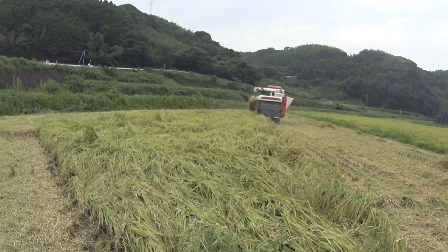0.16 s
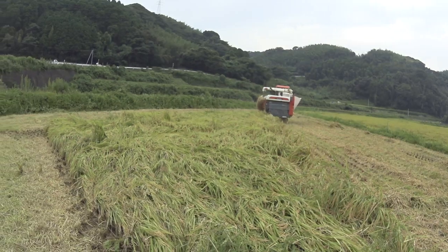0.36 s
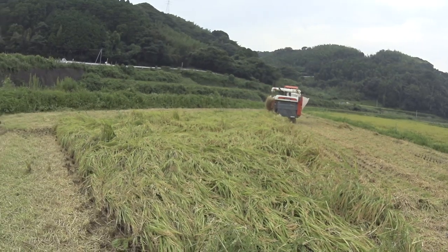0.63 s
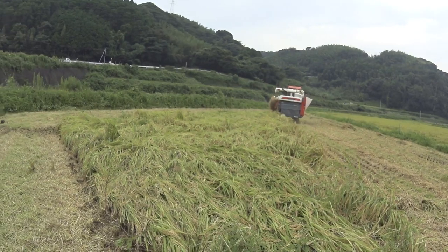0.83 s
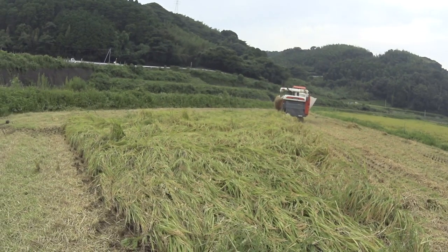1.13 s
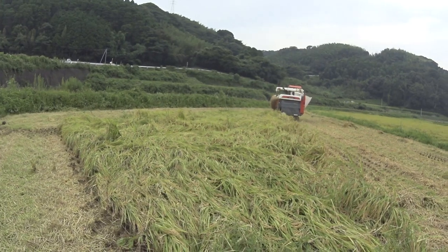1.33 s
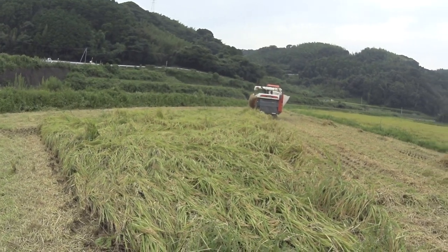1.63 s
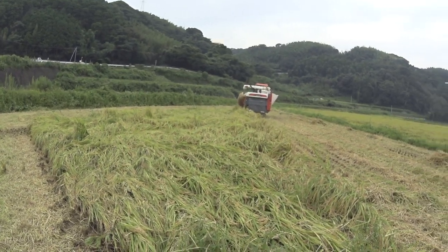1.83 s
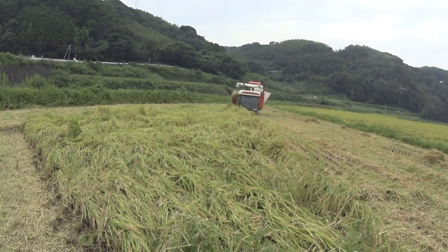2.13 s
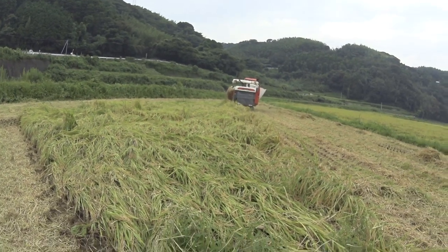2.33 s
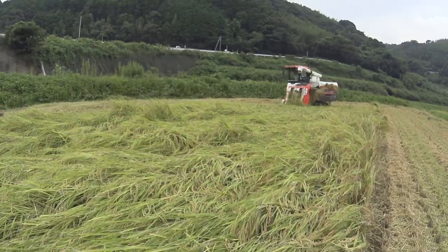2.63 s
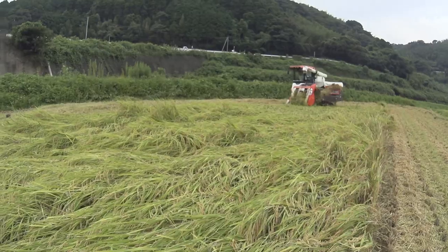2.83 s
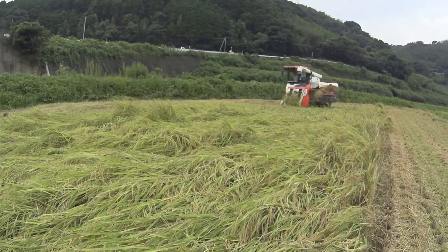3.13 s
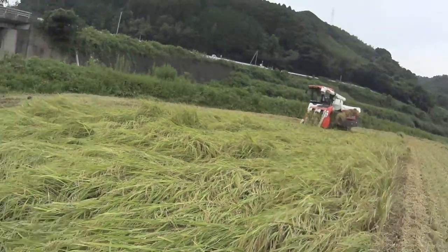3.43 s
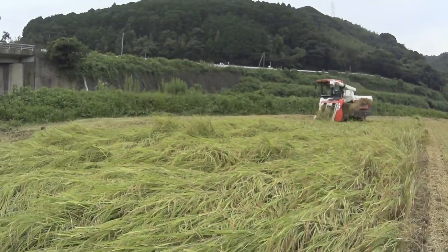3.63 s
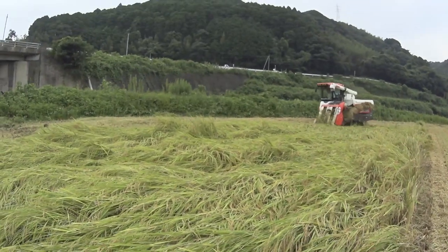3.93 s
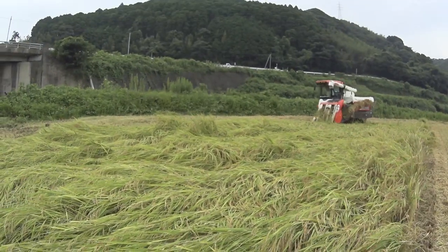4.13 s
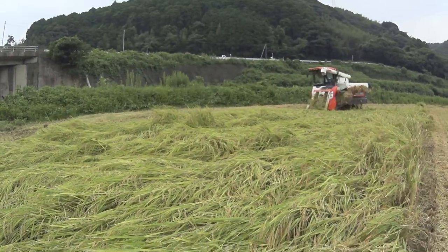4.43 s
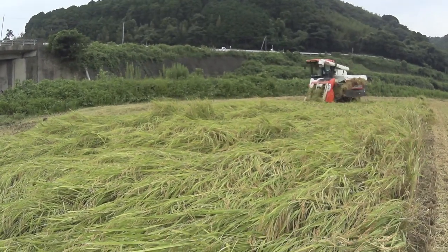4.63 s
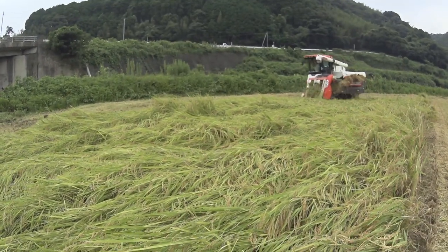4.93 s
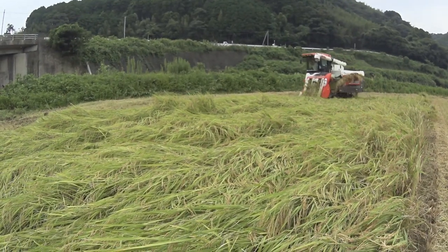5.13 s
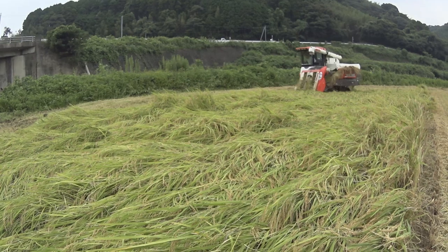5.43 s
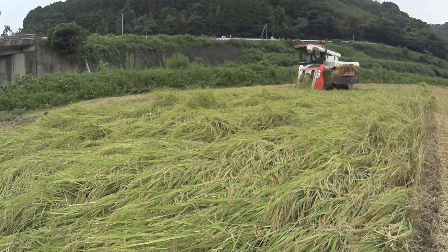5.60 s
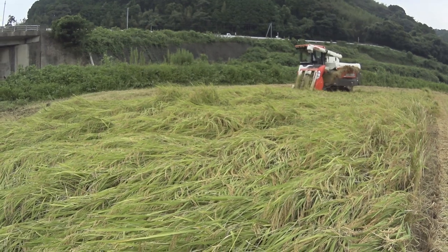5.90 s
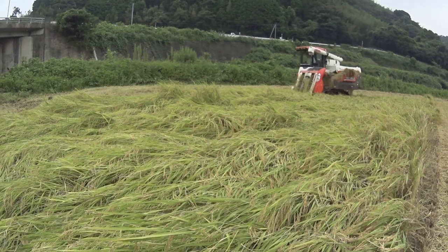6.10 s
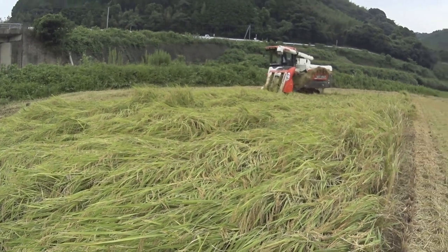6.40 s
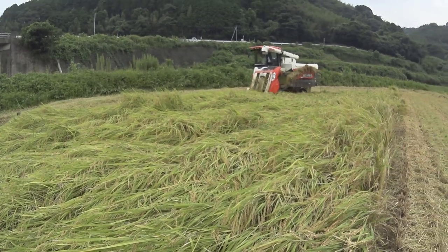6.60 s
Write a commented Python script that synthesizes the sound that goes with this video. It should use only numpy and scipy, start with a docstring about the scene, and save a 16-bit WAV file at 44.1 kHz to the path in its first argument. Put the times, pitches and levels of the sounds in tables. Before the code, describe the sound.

A hand-held stereo camera hears a combine across a field: distant broadband roar over a faint engine drone. After about two and a half seconds it drops silent for an instant, then the closer machine bursts in with knocks, scrapes and bumps from the hand. Once these settle, the roar grows louder, throbbing and rattling, with a quick regular knife clack and occasional high dry squeaks.

```python
"""Rice harvester across a field

A small harvester works far off, then, after a short silent cut, nearer; a hand-held camera hears it in stereo.
Steady tones make the engine and shafts, coloured noise the roar of fan, drum and straw over soft ground.
Dying rings make the knife's clacks and the jingle of chain and grain; short tone blips make the squeaks.
At the microphones the hand shifts on the camera case around the cut: rings tick, low pushes thump and
resonant noise rubs. These peaks make the limiter duck the machine.
"""
import sys
import numpy as np
from scipy import signal
from scipy.io import wavfile
from scipy.ndimage import uniform_filter1d

SR = 44100
rng = np.random.default_rng(int(sys.argv[2]) if len(sys.argv) > 2 else 0)


def amplitude_ratio(level_db):
    """Convert a level in decibels to the matching linear amplitude (field) ratio."""
    exponent = np.asarray(level_db, float) / 20
    return 10 ** exponent


def store_pcm(level_fs):
    """Save levels as 16-bit WAV."""
    pcm = np.round(np.clip(level_fs, -1, 1) * 32767).astype(np.int16)
    wavfile.write(sys.argv[1], SR, np.atleast_2d(pcm).T)


N = 298099
T = np.arange(N) / SR
CUT_S, RESTART_S = 2.549, 2.632  # the far take ends, the near one begins


def evened(x):
    """Scales to rms 1."""
    return x / np.sqrt(np.mean(x ** 2) + 1e-20)


def read(points, hz):
    """Reads a spectrum table on a log-frequency axis."""
    f, value = np.transpose(points)
    return np.interp(np.log(hz + 1), np.log(f + 1), value)


def add(mix, s, sound):
    """Mixes a sound in at s seconds."""
    part = mix[round(s * SR):][:len(sound)]
    part += sound[:len(part)]


def drift(t, top_hz, low_hz=0.3035):
    """Slow random wander of rms 1: sines of random phase, the slower the stronger."""
    rates = np.geomspace(low_hz, top_hz, num=24)
    return evened(sum(np.sin(2 * np.pi * (f * t + rng.random())) / np.sqrt(f) for f in rates))


def resonate(x, hz, width):
    """One resonance, hz at its centre, with a gain of about 1 there."""
    r = np.exp(-np.pi * width / SR)
    return 2 * signal.lfilter([1 - r], [1, -r * np.exp(2j * np.pi * hz / SR)], x).real


def ring(hz, t60, length=.08, rise=0.0018):
    """One dying mode with a soft start; times in s."""
    t = T[:round(length * SR)]
    return amplitude_ratio(-60 * t / t60) * np.sin(2 * np.pi * hz * t) * np.minimum(t / rise, 1)


# how loud the machine arrives; it swells as it turns this way after the cut: t/s, level/dB
ARRIVING_LEVEL = [(0, -17.5), (1.9, -18.5), (2.55, -20.5), (2.63, -16), (3.1, -14), (3.95, -13.5),
                  (4.42, -8), (4.7, -11.5), (5, -9), (5.5, -10), (6.3, -9.5), (6.76, -7.5)]


def loudness(t):
    """The machine's level in dB at times t."""
    return np.interp(t, *np.transpose(ARRIVING_LEVEL))


# engine and shaft tones, the upper five multiples of a gear mesh near 109 Hz:
# f/Hz, far rms level/dB, near rms level/dB, waver/dB
ENGINE_TONES = [(72.7, -55, -47, 1), (93.8, -38, -38.5, 0.9), (187.5, -44.5, -38, 3.2),
                (210, -52, -55, 5.5), (280.5, -54, -55, 1), (376, -56, -53, 1), (436, -57, -52, 4),
                (545, -60, -55, 4), (653, -60, -52, 4), (764, -62, -51, 4), (868, -60, -51, 4)]


def hum():
    """Firing tone, its overtones and shaft tones, each wavering a little in pitch and strength."""
    slow, out = T[::256], 0
    for hz, far_db, near_db, waver_db in ENGINE_TONES:
        bend, waver = (np.interp(T, slow, drift(slow, 8.1)) for _ in "ab")
        turns = np.cumsum(hz * (1 + 0.00415 * bend)) / SR + rng.random()
        distance_db = np.where(T < RESTART_S, far_db, near_db)
        level_db = distance_db + np.clip(waver_db * waver, -9, 3)
        out = out + np.sqrt(2) * amplitude_ratio(level_db) * np.sin(2 * np.pi * turns)
    return out * amplitude_ratio(np.array([[.8], [-.8]]))  # dB, leaning left


# the knife crank turns almost steadily; play in the joints makes each clack early or late, hard or soft
FIRST_CLACK_S, CRANK_TURNS_PER_S = 3.853, 8.22
PLAY_S, CLACK_SPREAD_DB, CLACK_OVER_ROAR_DB = .005, 1.5, 5
BAR_HZ, BAR_SPREAD_HZ = 1683, 29
# the load swings, so the crank falls behind and catches up
LAG_S, LAG_CYCLE_S, LAG_START_S = .014, 1.32, 4.35
# squeaks of dry joints in the near machine: t/s, peak level/dB, f/Hz
JOINT_SQUEAKS = [(3.66, -12, 4000), (3.685, -9, 4300), (3.695, -10, 4050), (4.245, -10, 3990),
                 (4.513, -8, 4030), (4.528, -11, 4050), (5.0, -11, 3980), (5.06, -8, 4000),
                 (5.925, -9, 3700), (6.165, -7, 4360), (6.47, -8, 4100)]


def knife():
    """Each turn of the knife crank clacks on the cutter bar; dry joints squeak now and then."""
    out = np.zeros(N)
    turns = np.arange(FIRST_CLACK_S, N / SR, 1 / CRANK_TURNS_PER_S)
    for s, (late, hard, high) in zip(turns, rng.standard_normal((len(turns), 3))):
        db = loudness(s) + CLACK_OVER_ROAR_DB + CLACK_SPREAD_DB * hard
        lag = LAG_S * np.sin(2 * np.pi * (s - LAG_START_S) / LAG_CYCLE_S)
        clack = ring(BAR_HZ + BAR_SPREAD_HZ * high, 0.029, rise=0.0025)
        add(out, s + PLAY_S * late + lag, amplitude_ratio(db) * clack)
    blip = np.hanning(round(.015 * SR))
    for s, db, hz in JOINT_SQUEAKS:
        add(out, s, amplitude_ratio(db) * np.sin(2 * np.pi * hz * T[:len(blip)]) * blip)
    return out


TICK_LEAN_DB, THUMP_LEAN_DB = 4, 4.1  # the hand sits nearer the left port
DULL_DB = -6  # dull part of a rub, before the lean between ports
# skin that catches on the case locks onto its main ring
SQUEAL_HZ, SQUEAL_WANDER_HZ, SQUEAL_SHARE = 1245, 60, .65
# fingers on the camera case: t/s, level of the lower rings/dB, upper rings above that/dB
FINGER_TICKS = [(2.187, -2, -19), (2.478, 3.5, -11), (2.505, -4, -9), (2.696, -6, -15), (2.729, 0.5, 11),
                (2.831, -5, 2), (2.859, -2, 10.5), (2.878, -8, 5), (2.882, -10, -2), (2.885, -19, 31.5),
                (2.95, -12, 18), (2.956, 3, 3), (3.011, 1, -9), (3.167, -3.5, -14), (3.196, -5, -4),
                (3.263, -3, -2), (3.362, 8, -9), (3.475, 4, -10), (3.492, 1, -15)]
# rings of the camera case, before each port shifts them: f/Hz, level/dB, t60/s
CASE_RINGS = [(1213, 4, 0.0085), (900, 4, 0.0053), (540, -2, 0.0047), (2194, -7, 0.03),
              (1840, -12.5, 0.027)]
# the grip shoves the microphones: t/s, level/dB, f/Hz, way (in 1, out -1)
GRIP_THUMPS = [(2.188, -5, 144, 1), (2.506, -7, 210, 1), (2.692, -8.5, 168, -1), (2.728, -3, 230, -1),
               (2.83, -2, 135, 1), (2.875, -2.5, 220, 1), (2.903, -12, 90, 1), (2.955, -6.5, 90, 1),
               (3.007, -3, 136, 1), (3.206, -4.5, 85, -1), (3.249, -11, 70, -1), (3.262, -3.5, 76.5, -1),
               (3.365, -3, 90, -1), (3.382, 0, 155, 1), (3.415, -10, 110, -1), (3.433, -6, 42, -1),
               (3.475, 4, 175, 1), (3.487, -6, 140, 1), (3.505, -12, 70, -1), (3.608, 0, 126, 1),
               (4.22, -4.5, 259, 1), (4.283, -7.5, 179, 1), (4.499, -20, 78, 1)]
# skin slides over the case: start t/s, length/s, level/dB, upper part above that/dB
SKIN_RUBS = [(2.702, 0.027, -22.5, -18), (2.863, 0.052, -14, -6), (2.934, 0.043, -17, -1.5),
             (3.008, 0.073, -9, -9), (3.066, 0.075, -20, 2), (3.204, 0.054, -17, -6),
             (3.361, 0.073, -6.5, -9.5), (3.47, 0.064, -21.5, -11)]


def hand():
    """Ticks ring the case, thumps push the diaphragms, rubs scrape; the two ports hear them unalike."""
    out = np.zeros((2, N))
    for s, db, upper_db in FINGER_TICKS:
        for ear, side in enumerate((1, -1)):
            tick = 0
            for hz, mode_db, t60 in CASE_RINGS:
                level = amplitude_ratio(mode_db + (upper_db if hz > 1500 else 0))
                tick = tick + level * ring(hz * (1 + 0.024 * side), t60, rise=0.00086)
            add(out[ear], s, amplitude_ratio(db + side * TICK_LEAN_DB / 2) * tick)
    for s, db, hz, way in GRIP_THUMPS:
        push = np.sign(way) * amplitude_ratio(db) * ring(hz, 4.2 / hz, length=.2)
        add(out[0], s, amplitude_ratio(THUMP_LEAN_DB / 2) * push)
        add(out[1], s + .07 / hz, amplitude_ratio(-THUMP_LEAN_DB / 2) * push)  # the far port lags a little
    for s, length, db, upper_db in SKIN_RUBS:
        scrape, other, slips = rng.standard_normal((SR // 5, 3))[:round(length * SR)].T
        stick_slip = amplitude_ratio(1.2 * evened(uniform_filter1d(slips, size=130)))  # skin sticks and slips
        stroke = signal.windows.tukey(len(scrape), .5) * stick_slip
        wander = evened(uniform_filter1d(other, size=200))
        squeal_turns = np.cumsum(SQUEAL_HZ + SQUEAL_WANDER_HZ * wander) / SR
        squeal = np.sqrt(2) * np.sin(2 * np.pi * squeal_turns)
        for ear, share, lean_db in zip(range(2), (0, 1.3), (2, -2)):
            grit = scrape + share * other
            lower = resonate(resonate(scrape + 0.29 * share * other, 1500, 260), 810, 220)
            lower = lower + 0.88 * resonate(grit, 720, 560)
            upper = resonate(resonate(grit, 1640, 900), 1650, 900)
            body = resonate(resonate(grit, 270, 520), 270, 520)
            lower = SQUEAL_SHARE * squeal + (1 - SQUEAL_SHARE) * evened(lower)
            rub = evened(lower) + amplitude_ratio(upper_db - lean_db) * evened(upper)
            rub = rub + amplitude_ratio(DULL_DB + lean_db) * evened(body)
            add(out[ear], s, amplitude_ratio(db) * stroke * rub)
    # one bright snap of a fingernail
    snap = resonate(rng.standard_normal(300), 5200, 4000) * np.hanning(300)
    for ear in out:
        add(ear, 2.848, amplitude_ratio(-12.0) * evened(snap))
    return out


# ringing panels of machine and camera, which also colour the roar:
# f/Hz, width/Hz, lift when far/dB, lift when near/dB
RINGING_PANELS = [(1270, 140, 7, 9.5), (1700, 340, 0, 5), (1850, 70, 5, 1), (1975, 110, -4, -2.5),
                  (2610, 55, 4, 4.5), (3120, 90, 5, 2), (3480, 100, 3.5, 0), (4720, 900, 8, 8.5),
                  (4872, 40, 0, 3.5), (6170, 130, 6, 5), (6460, 110, 3.5, 0), (6690, 190, 1, 7.5),
                  (7770, 40, 0, 8), (8647, 40, 0, 8)]


def jingle():
    """Chain links and grain strike the panels: tiny rings at random, following the machine's level."""
    out = np.zeros(N)
    for hz, width, *_ in RINGING_PANELS[4:-2]:  # the bright panels
        chance, size = rng.random((N, 2)).T
        for shift in (-.3, .3):  # two pitches a panel, each struck about 4.5 times a second
            struck = (chance % .5 < 4.5 / SR) * ((chance > .5) == (shift > 0))
            strikes = struck * amplitude_ratio(-7 * size)
            mode = ring(hz + shift * width, 0.028, length=.04, rise=0.0028)
            out += signal.oaconvolve(strikes, mode)[:N]
    return out * amplitude_ratio(loudness(T))


# colour of the broad noise heard from far off, scaled to its treble later; it steps up near 9.75 kHz: f/Hz,
# relative level per Hz/dB
FAR_COLOUR = [(25, -11), (60, -15), (110, -6), (250, -8), (340, -15), (650, -15), (1000, -10), (2000, -5.5),
              (4000, -10.5), (6300, -10), (7500, -16), (9500, -22), (9750, -14.5), (11100, -17.5)]
# the same from nearer: f/Hz, relative level per Hz/dB
NEAR_COLOUR = [(25, -8), (60, -10.5), (130, -9.5), (270, -7.5), (350, -14.5), (1080, -9), (1400, -6),
               (2000, -6), (2350, -1), (4000, -5.5), (6800, -8.5), (9600, -20.5), (9780, -8.5),
               (11100, -16)]
# likeness of the left and right microphones: f/Hz, likeness (1 = same)
PORT_LIKENESS = [(60, 0.61), (110, 0.99), (190, 0.95), (340, 0.74), (620, 0.68), (1110, 0.99), (1980, 0.88),
                 (3550, 0.92), (6360, 0.92), (11400, 0.76)]
# lean between the microphones: f/Hz, left over right level/dB
PORT_LEAN = [(60, 0), (110, 2.5), (190, 5), (340, 1), (620, 3.5), (1110, 0.5), (1980, -1), (3550, -2),
             (6360, -1), (11400, -5.5)]
# the ground echo cancels one band: fixed while far off, sliding down once the near machine starts to turn
DIP_FAR_HZ, DIP_START_HZ, DIP_END_HZ, TURN_S, SLIDE_S = 755, 960, 765, 3.75, 1.1
THROBS_PER_S = 17.96  # beats of the straw against the threshing drum


def roar():
    """Dense noise coloured by panels and the ground dip, in patches, throbbing with the drum."""
    frames, hz = N // 128 + 5, np.fft.rfftfreq(1024, 1 / SR)
    t = np.arange(frames) * 128 / SR
    near = t > (CUT_S + RESTART_S) / 2
    # panels colour the noise, and each buzzes up and falls still by itself
    shapes = np.array([1 / (1 + (2 * (hz - f) / width) ** 2) for f, width, *_ in RINGING_PANELS])
    lift = np.transpose(RINGING_PANELS)[2:] @ shapes
    rattle_db = shapes.T @ [.95 * drift(t, 30, low_hz=6) for _ in RINGING_PANELS]
    treble_band = (hz > 2500) & (hz < 9000)
    colours_db = read(FAR_COLOUR, hz) + lift[0], read(NEAR_COLOUR, hz) + lift[1]
    colour = [amplitude_ratio(db) / np.linalg.norm(amplitude_ratio(db)[treble_band]) for db in colours_db]
    field = np.where(near, colour[1][:, None], colour[0][:, None])
    # the echo off the stubble cancels one band
    slide = np.exp(-np.maximum(t - TURN_S, 0) / SLIDE_S)
    dip_hz = np.where(near, DIP_END_HZ + (DIP_START_HZ - DIP_END_HZ) * slide, DIP_FAR_HZ)
    dip_db = -8 * np.exp(-(np.log(hz[:, None] / dip_hz + 1e-9) / .12) ** 2)
    a, b, c, d, patches = rng.standard_normal((frames, 513, 5)).T
    patches = uniform_filter1d(patches, size=9, axis=0)
    patches = evened(uniform_filter1d(patches, size=24, axis=1))
    # hiss follows the loudness most, bass least
    treble = np.interp(hz, [0, 2400, 5500, 7000], [0.2, 0.75, 1.03, 1.15])[:, None]
    strokes = np.cos(2 * np.pi * THROBS_PER_S * (t - .037)) * np.where(near, .9, .3)
    # loose parts knock: brief wide flashes
    clatter = np.minimum(rng.exponential(1, frames), 4) ** 2 * np.where(near, .4, .2)
    level_db = loudness(t)
    # near by, the panels stand out more as the machine gets louder
    facing_db = np.where(near, 0.0083 * (level_db + 2.0), 0) * lift[1][:, None]
    bass_db = np.where(near, -13 + 0.47 * (t - TURN_S), -21)  # dB per second as it draws nearer
    swell_db = treble * (level_db + strokes + 1.14 * clatter) + (1 - treble) * bass_db
    # two microphones share part of the noise
    same, left = np.clip(read(PORT_LIKENESS, hz), -1, 1)[:, None], a + 1j * b
    z = np.array([left, same * left + np.sqrt(1 - same ** 2) * (c + 1j * d)])
    z *= amplitude_ratio(np.outer([.5, -.5], read(PORT_LEAN, hz)))[:, :, None]
    z *= field * amplitude_ratio(swell_db + facing_db + dip_db + rattle_db + 0.73 * patches)
    return 1.263 * signal.istft(z, nperseg=1024, noverlap=896)[1][:, :N]


def scene():
    """The machine in the field and the hand on the camera."""
    return roar() + hum() + knife() + jingle() + hand()


def low_pass(x):
    """Removes everything above the highest recorded frequency."""
    return signal.sosfilt(signal.butter(12, 11990, fs=SR, output="sos"), x)


def record(dry):
    """Camera chain: peak limiter, treble band edge, the cut with its short fade, hard clipping."""
    peak_db = 20 * np.log10(abs(dry).max(0) + 1e-9)
    recovery = 180 * T  # dB regained as time passes
    held_db = np.maximum.accumulate(peak_db + recovery) - recovery
    over_db = np.maximum(held_db - .8, 0)
    # it reacts just after a peak
    limited = dry / amplitude_ratio(1.05 * uniform_filter1d(over_db, size=180, origin=89))
    edge = signal.firwin(801, 11080, window=("kaiser", 11), fs=SR)  # low-pass, Hz
    band = signal.oaconvolve(limited, edge[None], "same")
    fade_db = np.interp(T, [CUT_S, 2.551, 2.569, 2.574, 2.63, RESTART_S], [0, -17, -28, -90, -90, 0])
    return low_pass(np.clip(band * amplitude_ratio(fade_db), -1, 1))


dry = scene()
out = record(dry)
store_pcm(out)
```